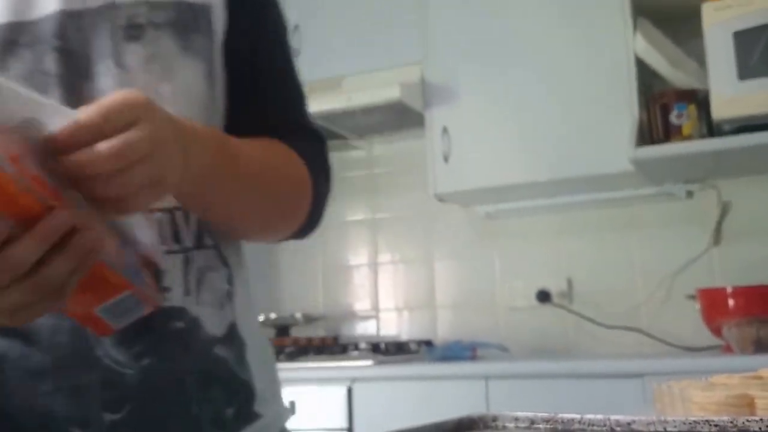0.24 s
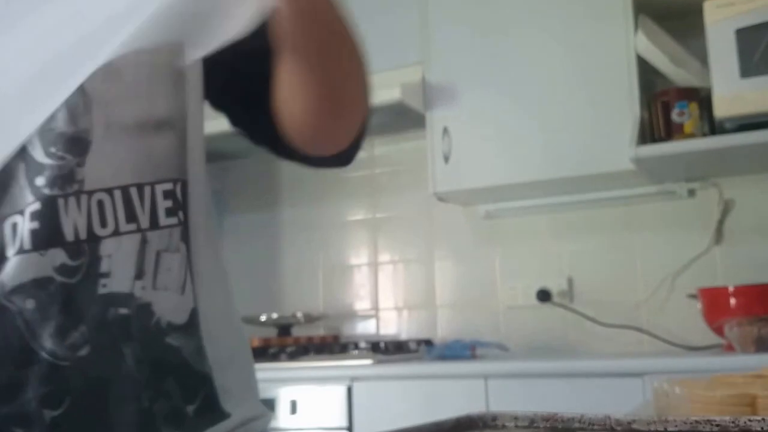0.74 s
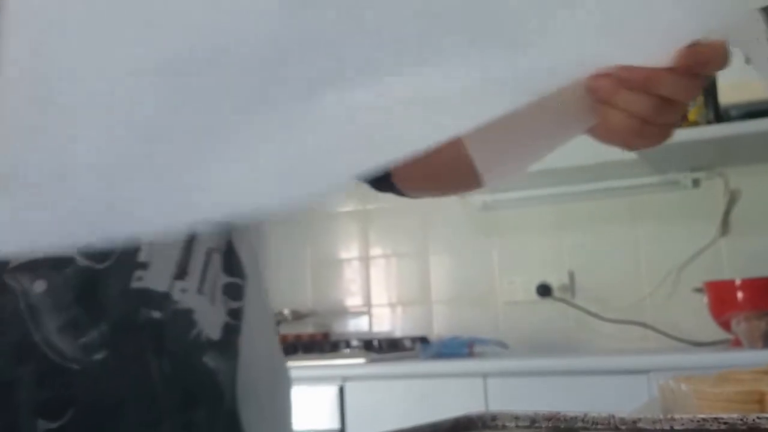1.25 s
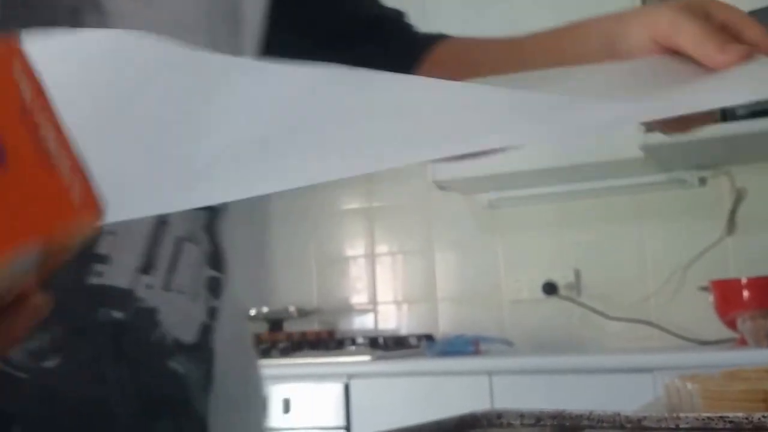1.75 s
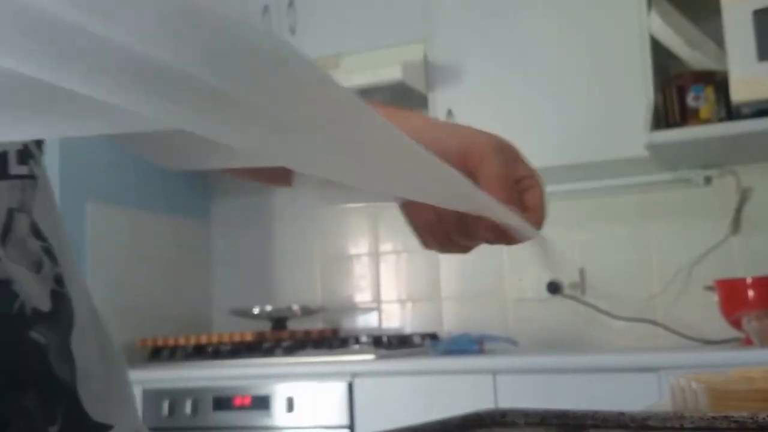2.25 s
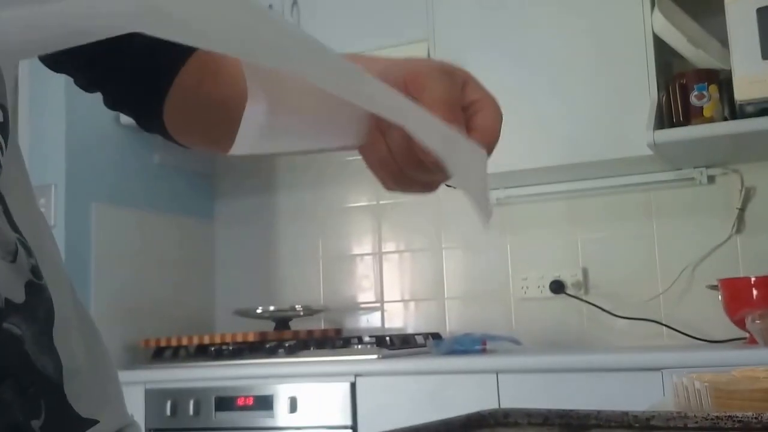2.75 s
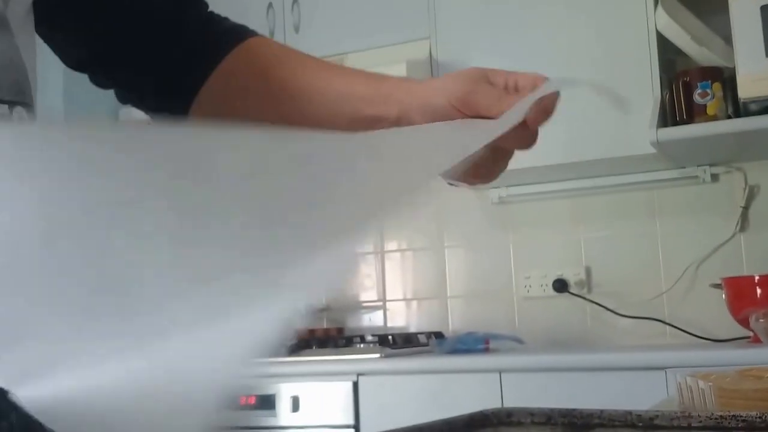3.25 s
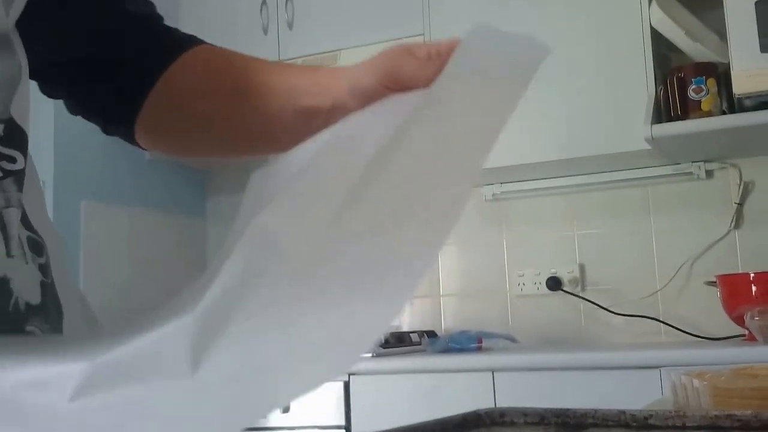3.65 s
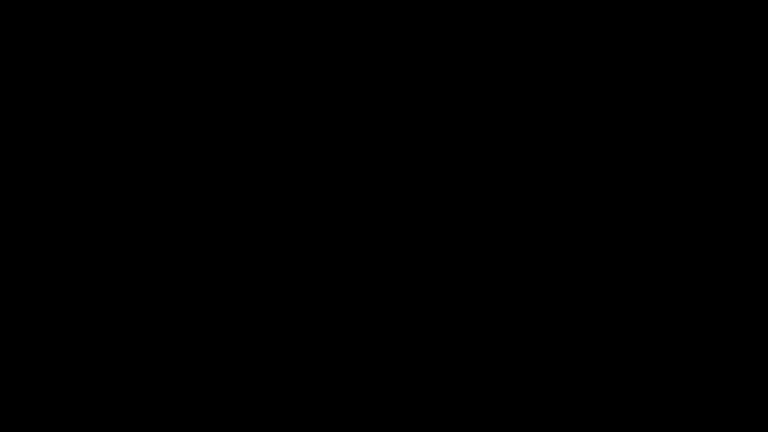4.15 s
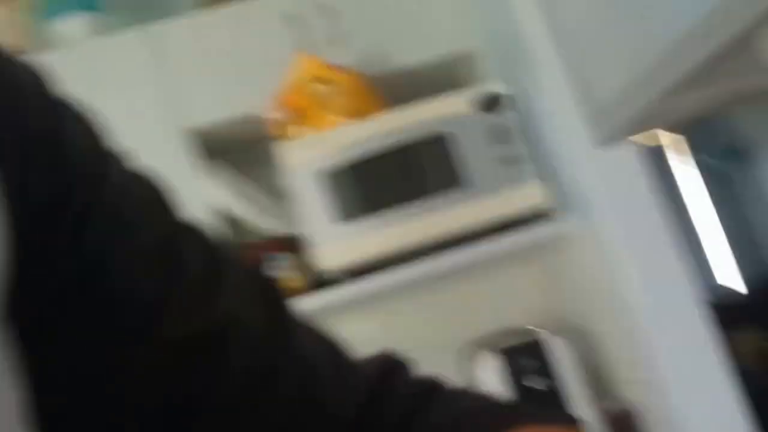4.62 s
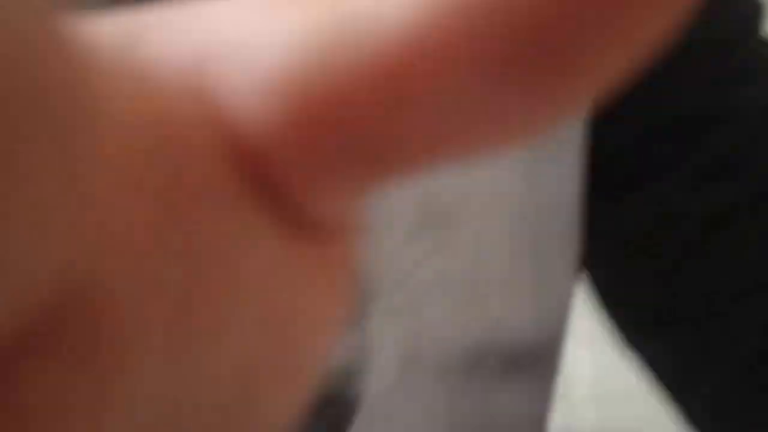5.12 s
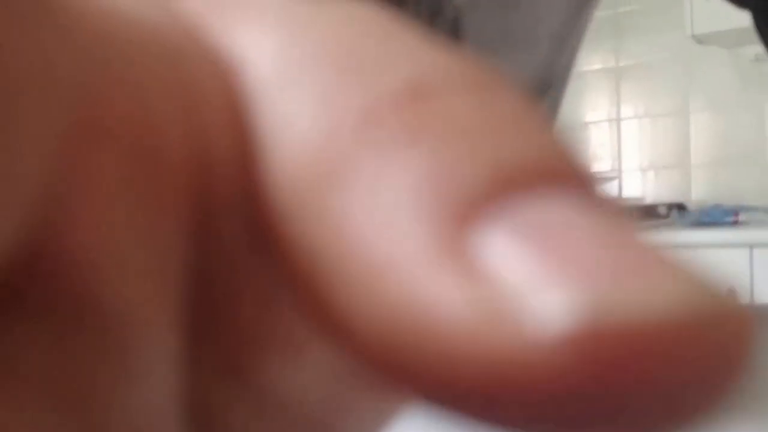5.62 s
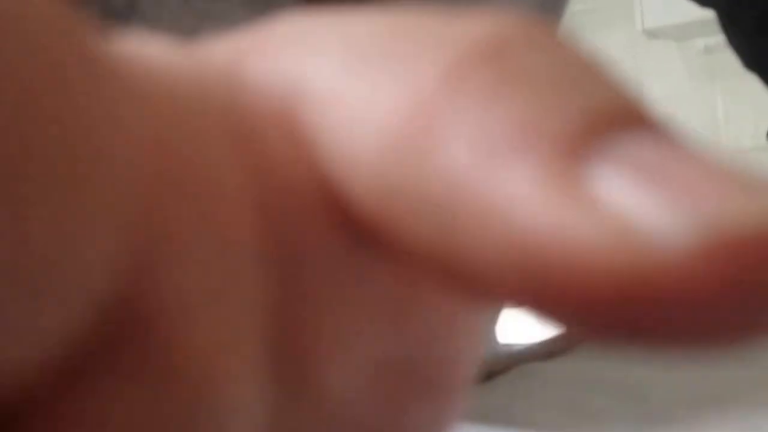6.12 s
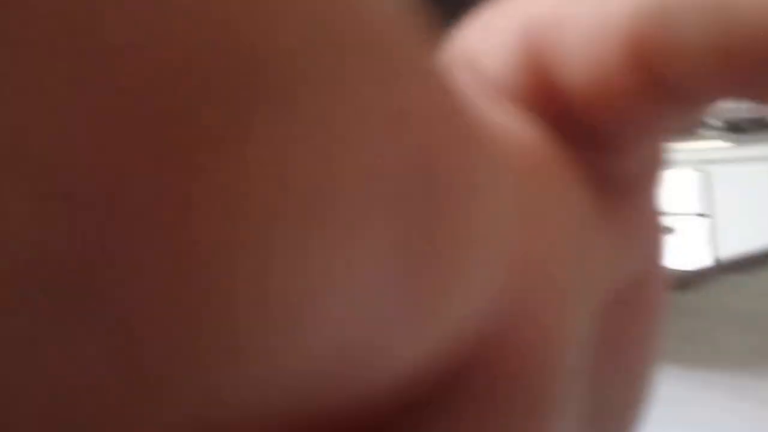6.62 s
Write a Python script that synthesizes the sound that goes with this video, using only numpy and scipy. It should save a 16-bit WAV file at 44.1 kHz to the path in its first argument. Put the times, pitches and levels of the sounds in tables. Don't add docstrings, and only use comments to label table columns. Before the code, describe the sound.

Thin paper slides from its box, quietly at first, then in a bright, crisp rush full of snapping creases. It eases, then is shaken harder, flapping air at the close stereo microphone. The rustle fades into handling: clattering case knocks, thumps and skin scrapes, abrupt silence, then soft finger rubs and a few clicks over faint kitchen hush.

```python
import sys
import numpy as np
from scipy import signal
from scipy.fft import rfft, irfft, next_fast_len
from scipy.io import wavfile
from scipy.ndimage import uniform_filter1d

SR = 44100
rng = np.random.default_rng(int(sys.argv[2]) if len(sys.argv) > 2 else 0)


def master(y):
    cut = np.clip(np.atleast_2d(y).T, -1, 1)
    pcm = np.round(cut * 32767)
    wavfile.write(sys.argv[1], SR, pcm.astype(np.int16))


def amplitude_ratio(level_db):
    exponent = np.asarray(level_db, float) / 20
    return 10 ** exponent


N = 302967
T = np.arange(N) / SR
STEPS_S = np.arange(0, N + 64, 32) / SR


def evened(x):
    return x / np.sqrt(np.mean(x ** 2) + 1e-20)


def read(points, hz):
    f, value = np.transpose(points)
    return np.interp(np.log(hz + 1), np.log(f + 1), value)


def joined(tables):
    return np.transpose([row for rows in tables for row in rows])


def add(mix, s, sound):
    part = mix[:, round(s * SR):][:, :sound.shape[1]]
    part += sound[:, :part.shape[1]]


def sides(pan_db):
    pair = np.array([amplitude_ratio(pan_db / 2), amplitude_ratio(-pan_db / 2)])
    return np.sqrt(2) * pair / np.cosh(pan_db / 17) ** .5


def layers(x, spectrum, edges_hz, same, order=6):
    size = next_fast_len(N)
    hz = np.fft.rfftfreq(size, 1 / SR)
    a, b = rfft(x, size)
    late = np.exp(-2j * np.pi * hz * .00025)
    right = same(hz) * a * late + np.sqrt(1 - same(hz) ** 2) * b
    z = np.array([a, right]) * spectrum(hz)
    below = [0] + [1 / (1 + (hz / edge) ** order) for edge in edges_hz] + [1]
    return [irfft(z * (up - down), size)[:, :N] for down, up in zip(below, below[1:])]


def grains(per_s, spread_db, grain_s, bed):
    size = amplitude_ratio(spread_db * np.minimum(rng.exponential(1, N), 4))
    size = size * (rng.random(N) < per_s / SR)
    pops = signal.lfilter([1], [1, -np.exp(-1 / (grain_s * SR))], size ** 2)
    return evened(np.sqrt(bed ** 2 + pops / pops.mean()))


def patchy(x, patchy_db):
    z = signal.stft(x, nperseg=256)[2]
    patches = uniform_filter1d(rng.standard_normal(z.shape[1:]), size=5, axis=0)
    patches = evened(uniform_filter1d(patches, size=7, axis=1))
    return signal.istft(z * amplitude_ratio(patchy_db * patches), nperseg=256)[1][:, :N]


def surge(s, db, swell_s, fade_s, hold_s=0):
    before = np.maximum(s - STEPS_S, 0) / swell_s
    after = np.maximum(STEPS_S - s - hold_s, 0) / fade_s
    return db - 15 * (before + after)


def summed_db(levels_db):
    return 10 * np.log10(sum(amplitude_ratio(2 * np.maximum(db, -150)) for db in levels_db))


# pitch_hz, share
PORTS_ALIKE = [(60, 1), (300, 0.25), (700, 0.88), (2000, 0.12), (10000, 0.1)]


def paper_same(hz):
    return np.clip(read(PORTS_ALIKE, hz), 0, 1)


# pitch_hz, level_db_per_hz
PAPER = [(24, -40.5), (40, -16.5), (120, -11), (281, -18), (429, -14), (886, -6), (1050, -3), (1610, -3.5),
         (2590, -6.5), (4600, 1.5), (7400, -3.5), (10200, 3.5), (13400, -12), (15700, -16)]
# pitch_hz, left_right_db
PORTS = [(60, -8), (110, -6.5), (200, -4), (380, -3), (700, -3.0), (1290, -9), (2380, -2.5), (4400, 7.0),
         (8120, -6), (15000, -2.5)]
# pitch_hz, width_hz, level_db
CAVITY = [(4600, 1100, 3.5), (10260, 2500, -6)]
# pitch_hz, width_hz, level_db
SHELF = [(290, 27, -12.5), (410, 270, 8.5)]


def paper_colour(hz):
    def bump(f, width_hz, db):
        return db / (1 + (2 * (hz - f) / width_hz) ** 2)

    cavity_db = np.array([bump(*row) for row in CAVITY])
    port_db = np.outer([.5, -.5], read(PORTS, hz)) + cavity_db
    return amplitude_ratio(read(PAPER, hz) + sum(bump(*row) for row in SHELF) + port_db)


# pitch_hz, level_db_per_hz
HUSH = [(18, -52.5), (30, -23.5), (103, -2), (219, -8.5), (325, -35), (401, -0.5), (469, -20), (625, -8),
        (2440, -19.5), (15700, -24.5)]


def hush():
    noise = rng.standard_normal((2, N))
    air, = layers(noise, lambda hz: amplitude_ratio(read(HUSH, hz)), (), paper_same)
    return amplitude_ratio(-61.5 + 0.5) * evened(air)


# pitch_hz, t60_s
WALLS = [(200, 0.15), (1000, 0.23), (5000, 0.25), (14000, 0.13)]


def kitchen(x):
    echoes = np.zeros((2, SR // 2))
    at = np.arange(200, SR // 2 - 20, 20)
    shape = (2, len(at))
    np.put_along_axis(echoes, at + rng.integers(0, 20, shape), rng.choice([-1., 1.], shape), 1)
    hz, t, z = signal.stft(echoes, SR, nperseg=256)
    decay = amplitude_ratio(-60 * t / read(WALLS, hz)[:, None])
    tail = signal.istft(z * decay, SR, nperseg=256)[1]
    return signal.fftconvolve(x, tail / np.linalg.norm(tail[0]), axes=1)[:, :N]


# start_s, level_db, pitch_hz, t60_s, left_right_db
TAPS = [(.236, -22, 593, 0.029, -6), (.239, -17.5, 950, 0.023, -3), (.386, -33.5, 795, .04, -9),
        (0.397, -31.5, 348, 0.054, -4), (.605, -36.5, 1330, .07, -6), (1.533, -31.5, 1140, 0.059, -6),
        (1.946, -22, 1330, 0.055, -3), (2.64, -26, 463, 0.08, -5), (3.562, -29, 95, 0.13, -2),
        (3.915, -16, 749, .05, -5), (3.929, -14.5, 410, .05, -5), (4.893, -23.5, 388, 0.054, 1),
        (4.913, -28.5, 456, 0.091, -10), (5.184, -20.5, 915, 0.038, -5)]


def taps():
    out, t = np.zeros((2, N)), np.arange(6000) / SR
    for s, db, hz, t60_s, pan_db in TAPS:
        ring = np.sin(2 * np.pi * hz * t)
        ring = ring + 0.21 * np.sin(2 * np.pi * 0.28 * hz * t)
        ring = ring + .22 * np.sin(2 * np.pi * 1.9 * hz * t)
        envelope = amplitude_ratio(db - 4.5 - 60 * t / t60_s) * (1 - np.exp(-t / .002))
        add(out, s, np.outer(sides(pan_db), envelope * ring))
    return out


# start_s, end_s
GAP = (5.889, 6.413)
# start_s, tick_db, hollow_ring_db, thump_db, left_right_db
KNOCKS = [(5.462, -17.5, 3, -34, 3), (5.845, -10.5, -14, -17.5, 10), (5.3944, -24, -18, -58, -5.5),
          (5.4743, -3.5, -38, -5, -5), (5.5173, -8.5, 4, -18, 2), (5.5513, -7, -9.5, -24, 1.5),
          (5.572, -21, -5.5, -27, 1), (5.6097, -1, -6, -31, 4.5), (5.725, -20.5, -9, -34, -.5),
          (5.8242, -5, -14, -14.5, -2), (5.8712, 1, -22.5, 3.5, 14.5), (6.6628, -17.5, -64, -51, 6),
          (6.6824, -35, -35, -31, -14), (6.7074, -27.5, -52, -46, -20), (6.7636, -16, -46, -27, 6),
          (6.7663, -5.5, -19, -19.5, 16), (6.7703, -5, -31, -30, -6.5), (6.8064, -13.5, -52, -43, -17.5),
          (6.8264, -31, -49, -42, 6), (6.778, -17, -45, -45, 14), (5.8674, 0, -30, -30, -1)]
# pitch_hz, level_db, share_of_ring_length
CASE = [(410, -5.36, 0.72), (625, -20, .6), (950, -13, 0.33), (1305, -31, .5)]
# pitch_hz, level_re_crack_db
TICK = [(3000, -14.5), (4100, -1.5)]


def knocks():
    out, t = np.zeros((2, N)), np.arange(6000) / SR
    ring_s = .019

    def ring(hz, t60_s):
        return amplitude_ratio(-60 * t / t60_s) * np.sin(2 * np.pi * hz * t)

    def damped(hz, share):
        return np.sin(2 * np.pi * hz * t) * np.exp(-(t / (ring_s * share)) ** 2)

    detune = rng.uniform(1.0, 1.04, (len(KNOCKS), 3))
    cracks = rng.standard_normal((len(KNOCKS), 2, 6000))
    for (s, tick_db, ring_db, thump_db, pan_db), (a, b, c), crack in zip(KNOCKS, detune, cracks):
        tick = uniform_filter1d(crack, size=3) * np.exp(-t / 0.00077)
        shell = sum(amplitude_ratio(db) * ring(hz * a, 0.042) for hz, db in TICK)
        tick = tick + amplitude_ratio(1.1 * tick_db + 9.5) * uniform_filter1d(crack, size=24) * shell
        hollow = sum(amplitude_ratio(db) * damped(hz * b, share) for hz, db, share in CASE)
        hollow = hollow * (1 - np.exp(-t / .003))
        thump_db = min(thump_db, -8)
        thump_hz = 105 if s < GAP[0] else 72
        thump = ring(thump_hz * c, 0.072) * (1 - np.exp(-t / 0.0062))
        blow = amplitude_ratio(tick_db - 7) * tick + amplitude_ratio(ring_db - 3) * hollow + amplitude_ratio(thump_db + 8.5) * thump
        add(out, s, sides(pan_db)[:, None] * blow / np.sqrt(2))
    return out


# pitch_hz, level_db_per_hz
SKIN = [(20, -32), (64, 2), (298, -5), (500, -9), (1400, -10.5), (3200, -17), (5500, -16), (6500, -10),
        (8700, -19), (10900, -6), (13000, -18), (15700, -24)]
# start_s, pressure_db, slide_db, left_right_db
GRAB = [(5.458, -48, -39, -3.5), (5.468, -16, -20, -2.5), (5.5, -22, -27, -7), (5.57, -27, -28, -8),
        (5.64, -26, -36.5, -8), (5.7, -31, -35, -16)]
SCRAPE = [(5.735, -27, -32, -15.5), (5.765, -36, -33, -15.5), (5.81, -32.5, -26, -18.5),
          (5.845, -15.5, -18.5, -18.5), (5.874, -14, -17, -19), (5.88, -27, -26, 22), (5.89, -31, -26, 30)]
REGRIP = [(6.412, -39, -48, -15), (6.45, -56, -49, -18), (6.495, -66, -50, -20), (6.515, -58, -65, -11),
          (6.53, -46, -48, -20), (6.568, -69, -47, -18.5), (6.58, -71, -60, -9), (6.61, -57, -65, -1)]
SETTLE = [(6.68, -63, -64, -11.5), (6.702, -42, -58, -10.5), (6.707, -60, -44, -17), (6.755, -56, -53, -6),
          (6.77, -29, -41, -2), (6.8, -40, -56, -4), (6.87, -59, -60, -3.5)]
HISS_RE_SLIDE_DB = (-17, -7, -5, -2)
RASP_RE_SLIDE_DB = (-10, -7.5, -21, -17)
# rub_db, rasp_db, scuff_db, hiss_db
LEFT_PORT_DB = (-4, -5, 6, -4)
# peak_s, level_db, swell_s, fade_s, hold_s
SQUEAK = (5.775, -39, .05, .02, .05)
# low_hz, high_hz
SQUEAK_HZ = (10700, 11150)


def grips():
    hands = [GRAB, SCRAPE, REGRIP, SETTLE]
    s, push_db, rub_db, pan_db = joined(hands)
    rows = [len(hand) for hand in hands]
    hiss_db = rub_db + np.repeat(HISS_RE_SLIDE_DB, rows)
    rasp_db = rub_db + np.repeat(RASP_RE_SLIDE_DB, rows)
    scuff_db = (rub_db + hiss_db) / 2 - 12

    def level(db):
        return amplitude_ratio(np.interp(T, s, db, left=-120))

    bands = layers(rng.standard_normal((2, N)), lambda hz: amplitude_ratio(read(SKIN, hz)),
                   (250, 1480, 2350, 5600), lambda hz: .7 / (1 + hz / 400), order=24)
    push, *upper = map(evened, bands)
    rub, rasp, scuff, hiss = (x * amplitude_ratio(np.array([[db], [0]])) for x, db in zip(upper, LEFT_PORT_DB))
    slips = grains(per_s=76, spread_db=1.0, grain_s=0.005, bed=1.5)
    whistle = signal.butter(2, SQUEAK_HZ, "band", fs=SR, output="sos")
    squeak = evened(signal.sosfilt(whistle, hiss)) * amplitude_ratio(np.interp(T, STEPS_S, surge(*SQUEAK)))
    slide = level(rub_db) * rub + level(rasp_db) * rasp
    slide = slide + level(scuff_db) * scuff + level(hiss_db) * hiss
    pan_db = np.interp(T, s, pan_db)
    return level(push_db) * push * sides(.5 * pan_db) + (slips * slide + squeak) * sides(pan_db)


EDGES_HZ = (423, 2560, 6670)
# start_s, peak_db, body_re_peak_db
CREASES = [(.1615, -42, 0), (.268, -20, -12), (.32, -25.5, -52), (.3394, -30, -17), (.383, -30.5, -.5),
           (.4694, -48.5, 2), (.524, -42, -20), (.5736, -44, 1), (.606, -31.5, 0), (.6943, -33, -9),
           (.7457, -40.5, -12), (.7744, -36, -18), (.8744, -49, -6), (.9592, -33, -20), (1.0694, -50.5, -5),
           (1.4694, -52, 13), (1.4925, -42, 8), (1.5318, -33.5, -2),
           (1.7343, -35.5, -13), (1.7513, -24.5, -7), (1.8246, -20.5, -8), (1.8426, -17.5, -23),
          (1.879, -23.5, -12), (1.9329, -22.5, 3), (1.9708, -19, -9), (2.0187, -6, -15), (2.0885, -11, -21),
          (2.093, -14, -8.5), (2.123, -9, -15), (2.2212, -4.5, -16), (2.4073, -6, -25), (2.5365, -3, -13.5),
          (2.557, -8, -15), (2.7979, -15, -21), (2.8154, -17.5, -19), (2.8613, -12, -23), (2.8962, -19, -5),
          (2.9356, -19, -17), (3.0548, -17, -8), (3.0893, -16, -29), (3.2115, -31.5, -7),
          (3.3033, -27, 2.5),
           (3.411, -20, -10), (3.422, -17.5, -26), (3.451, -15, -20), (3.5452, -20, -3.5),
          (3.5787, -14, -18), (3.6405, -13, -15), (3.6485, -7, -20), (3.6605, -3, -23.5),
          (3.7024, -4.5, -25.5), (3.7802, -14, -10), (3.8445, -10, -24), (3.872, -10, -25),
          (3.8934, -3, -18.5), (4.0286, -4, -16), (4.0335, -8, -14), (4.045, -8, -14), (4.1119, -10, -27),
          (4.1194, -12, -20), (4.1354, -9, -9), (4.1528, -8, -15), (4.1875, -7, -21), (4.2222, -1, -16.5),
          (4.317, -3, -24.5), (4.3494, -.5, -12.5), (4.4157, -7, -17),
           (4.5395, -4, -19), (4.5514, -6, -11), (4.8178, -16, -9), (5.0658, -22, -10.5),
          (5.1446, -21.5, -25.5), (5.1645, -21.5, -9), (5.199, -19, -11), (5.2164, -15, -27),
          (5.2738, -13.5, -23), (5.3766, -16, -9), (5.4319, -17, -8), (5.4614, -8.5, -3), (5.5192, -13, -9),
          (5.61, -10.5, 0)]


def snaps():
    crack, boom, t = np.zeros((1, N)), np.zeros((1, N)), np.arange(2000) / SR
    creases = CREASES
    lean_db = np.interp(T, np.transpose(creases)[0], 3.0 * rng.standard_normal(len(creases)))
    snap_s = .005
    fade = np.exp(-2 * t / snap_s)[None]
    for s, db, body_db in creases:
        add(crack, s, amplitude_ratio(2 * (db - 8.5)) * fade * (1 - np.exp(-t / 0.0005)))
        add(boom, s, amplitude_ratio(2 * (db + body_db - 5)) * fade * (1 - np.exp(-t / 0.0019)) ** 2)
    bands = layers(rng.standard_normal((2, N)), paper_colour, EDGES_HZ[:2], paper_same)
    _, body, bright = map(evened, bands)
    return (np.sqrt(crack) * bright + np.sqrt(boom) * body) * sides(lean_db)


# start_s, steady_drag_db, slackness_db, closeness_db
HANDLING = [(0, -73, -5, 1), (.3, -70, -2, -1), (.75, -76, -1, 0), (.9, -80, -1, -4), (1.228, -75, 0, -2),
            (1.4, -68, 2, -2), (1.6, -68, 5, 4), (1.73, -66, 0, -7), (1.99, -52, 0, -3), (2.09, -37, 1, 2),
            (2.52, -33, 0, -1), (2.74, -47, 1, -5), (3.17, -52, -1, -10), (3.4, -44, 2.5, -7.5),
            (3.9, -46, -1, 0), (4.5, -48, -3, 0), (4.6, -46, 4, 0), (5.1, -52, -1.5, -9),
            (5.7, -48, -5, -8), (5.85, -38, -10, -10)]
# peak_s, level_db, swell_s, fade_s
TUGS = [(0.0, -37.0, 0.006, 0.059), (0.116, -62.6, 0.022, 0.125), (0.164, -62.7, 0.006, 0.021),
        (0.231, -51.9, 0.006, 0.12), (0.242, -47.5, 0.022, 0.026), (0.268, -37.6, 0.01, 0.042),
        (0.287, -42.2, 0.069, 0.161), (0.347, -45.9, 0.031, 0.027), (0.394, -45.2, 0.069, 0.046),
        (0.575, -53.8, 0.006, 0.052), (0.598, -47.5, 0.036, 0.185), (0.627, -49.0, 0.023, 0.02),
        (0.694, -54.6, 0.006, 0.052), (0.746, -56.3, 0.006, 0.052), (0.878, -57.8, 0.009, 0.055),
        (0.922, -57.1, 0.094, 0.299), (0.959, -47.9, 0.013, 0.062), (1.026, -59.5, 0.02, 0.02),
        (1.101, -60.2, 0.023, 0.053), (1.369, -65.6, 0.061, 0.122), (1.54, -54.6, 0.02, 0.02),
        (1.553, -53.1, 0.113, 0.125), (1.754, -40.0, 0.014, 0.044), (1.82, -42.7, 0.008, 0.02),
        (1.85, -37.7, 0.066, 0.087), (1.881, -41.6, 0.011, 0.023), (1.929, -36.4, 0.031, 0.062),
        (1.949, -37.9, 0.023, 0.033), (1.976, -38.2, 0.022, 0.02), (2.019, -24.0, 0.014, 0.049),
        (2.029, -35.2, 0.157, 0.302), (2.088, -28.2, 0.022, 0.032), (2.127, -25.0, 0.102, 0.11),
        (2.224, -27.2, 0.019, 0.146), (2.414, -27.4, 0.214, 0.109), (2.535, -24.6, 0.008, 0.063),
        (2.552, -23.5, 0.092, 0.141), (2.647, -26.8, 0.05, 0.076), (2.795, -36.2, 0.012, 0.058),
        (2.858, -29.4, 0.009, 0.028), (2.868, -29.1, 0.126, 0.127), (2.907, -31.3, 0.039, 0.036),
        (2.937, -34.8, 0.026, 0.02), (3.017, -41.9, 0.021, 0.021), (3.057, -36.0, 0.009, 0.037),
        (3.088, -33.4, 0.088, 0.091), (3.132, -38.7, 0.029, 0.02), (3.222, -39.1, 0.036, 0.073),
        (3.301, -40.2, 0.006, 0.022), (3.322, -34.5, 0.045, 0.048), (3.428, -24.3, 0.052, 0.08),
          (3.548, -31.1, 0.012, 0.037), (3.573, -27.7, 0.033, 0.076), (3.589, -26.9, 0.025, 0.046),
          (3.654, -17.6, 0.023, 0.11), (3.668, -23.1, 0.121, 0.152), (3.709, -19.8, 0.037, 0.045),
          (3.794, -30.3, 0.032, 0.024), (3.848, -25.0, 0.014, 0.039), (3.895, -19.8, 0.006, 0.06),
          (3.908, -29.2, 0.097, 0.243), (3.933, -11.8, 0.054, 0.051), (4.031, -24.0, 0.011, 0.033),
          (4.053, -19.0, 0.041, 0.04), (4.115, -29.3, 0.007, 0.055), (4.147, -27.8, 0.026, 0.028),
          (4.195, -22.9, 0.017, 0.026), (4.223, -20.9, 0.006, 0.03), (4.237, -20.3, 0.158, 0.062),
          (4.319, -18.8, 0.012, 0.119), (4.348, -29.4, 0.144, 0.496), (4.356, -21.0, 0.039, 0.02),
          (4.419, -26.4, 0.032, 0.07), (4.439, -27.0, 0.022, 0.022), (4.475, -30.6, 0.006, 0.023),
          (4.506, -29.9, 0.066, 0.02), (4.563, -13.3, 0.008, 0.131), (4.666, -20.2, 0.103, 0.182),
          (4.7, -14.2, 0.094, 0.056), (4.834, -26.9, 0.042, 0.028), (4.942, -41.4, 0.007, 0.023),
          (5.006, -39.0, 0.048, 0.03), (5.068, -37.9, 0.011, 0.027), (5.086, -35.1, 0.045, 0.028),
          (5.143, -37.1, 0.01, 0.032), (5.169, -31.8, 0.024, 0.029), (5.226, -24.5, 0.064, 0.042),
          (5.28, -34.9, 0.161, 0.151), (5.283, -26.0, 0.029, 0.03), (5.379, -41.1, 0.031, 0.25),
          (5.464, -23.5, 0.006, 0.062), (5.473, -23.6, 0.032, 0.145), (5.477, -22.8, 0.007, 0.022),
          (5.545, -27.7, 0.042, 0.029), (5.616, -26.4, 0.021, 0.021), (5.667, -42.6, 0.025, 0.025)]
# peak_s, level_db, swell_s, fade_s
WHIP = (4.555, -12, .006, .07)
# peak_s, level_db, spread_s
FLAPS = [(.4, -46, .04), (.61, -49, .06), (2.125, -45, .05), (2.655, -38, .04), (3.45, -46, .04),
         (3.675, -34, .09), (3.925, -28, .06), (4.045, -34, .07), (4.24, -35, .08), (4.345, -30, .06),
         (4.572, -19.5, .09), (4.66, -32, .06), (4.915, -44, .06)]


def rustle():
    whip_hold_s, sheet_ends_s = .11, 5.87
    middle_db, body_follows, body_re_middle_db = -32, .65, -3.5
    draught_db = -55
    dull_hz = 1800

    s, *controls = np.transpose(HANDLING)
    drag_db, slack_db, close_db = (np.interp(STEPS_S, s, c) for c in controls)
    tugs_db = [surge(*row) for row in TUGS]
    crinkle_db = summed_db([drag_db, surge(*WHIP, whip_hold_s)] + tugs_db)
    body_db = middle_db + body_follows * (crinkle_db - middle_db) + body_re_middle_db + slack_db
    edge_db = (body_db + crinkle_db) / 2 - 10
    flaps_db = [surge(s, db, .45 * spread_s, spread_s) for s, db, spread_s in FLAPS]
    flap_db = summed_db([draught_db + .15 * crinkle_db] + flaps_db)

    def level(db):
        return amplitude_ratio(np.interp(T, STEPS_S, db))

    noise = patchy(rng.standard_normal((2, N)), patchy_db=1.8)
    bands = layers(noise, paper_colour, sorted(EDGES_HZ + (dull_hz,)), paper_same)
    flap, body, edge, crinkle, fizz = map(evened, bands)
    wide = grains(per_s=250, spread_db=1.5, grain_s=0.0025, bed=2.2)
    folds = grains(per_s=83, spread_db=2.5, grain_s=.005, bed=1.4)
    crinkle = crinkle * grains(per_s=200, spread_db=3.0, grain_s=.0012, bed=1.2)
    fizz = fizz * grains(per_s=400, spread_db=3.2, grain_s=.0008, bed=1.2)
    sheet = level(crinkle_db - .8) * crinkle
    sheet = sheet + folds * (level(body_db - 2.6) * body + level(edge_db) * edge)
    sheet = sheet + level(crinkle_db + close_db - .7) * fizz
    return (wide * sheet + level(flap_db) * flap) * (T < sheet_ends_s)


def scene():
    crackle, sheet = snaps() + taps(), rustle()
    echo = kitchen(amplitude_ratio(-6.5) * crackle + amplitude_ratio(-15) * sheet)
    return crackle + sheet + echo + grips() + knocks() + hush()


def band_limit(x):
    return signal.sosfilt(signal.butter(12, 15810, fs=SR, output="sos"), x)


def record(dry):
    live = (T < GAP[0]) | (T > GAP[1])
    heard = signal.sosfilt(signal.butter(2, 62 / (SR / 2), "high", output="sos"), dry)
    mix = np.clip(heard, -.96, .96) * uniform_filter1d(live * 1., size=30)
    return band_limit(mix)


dry = scene()
out = record(dry)
master(out)
```